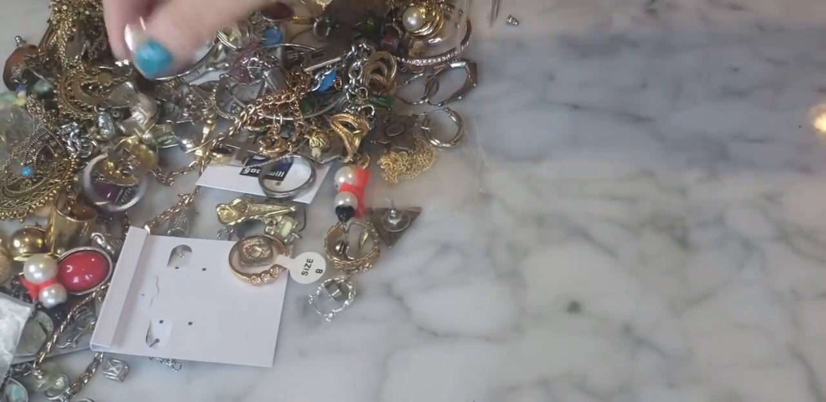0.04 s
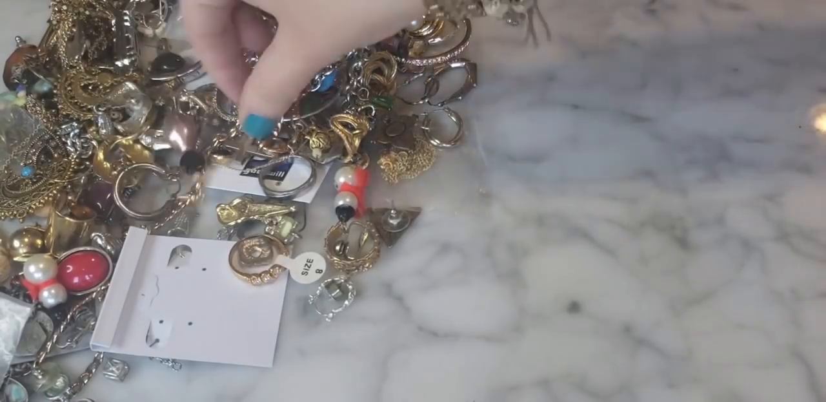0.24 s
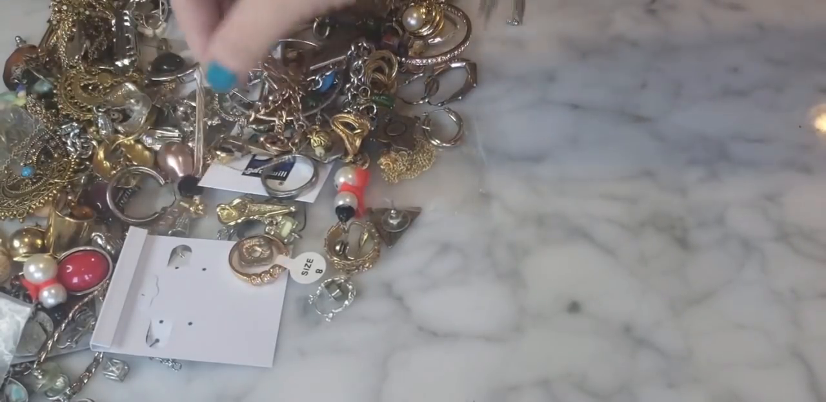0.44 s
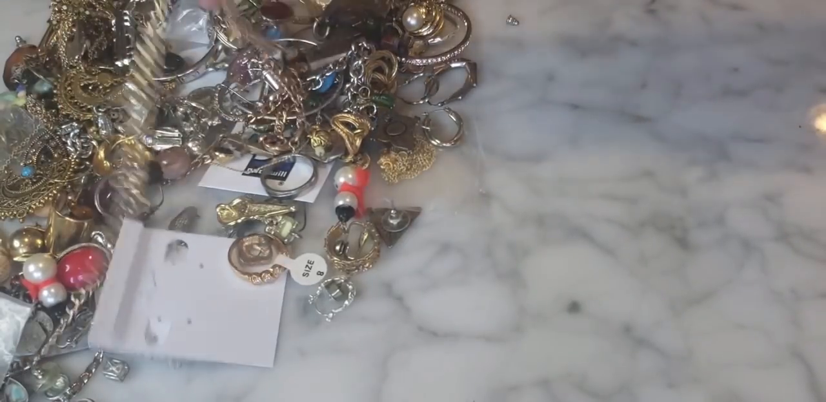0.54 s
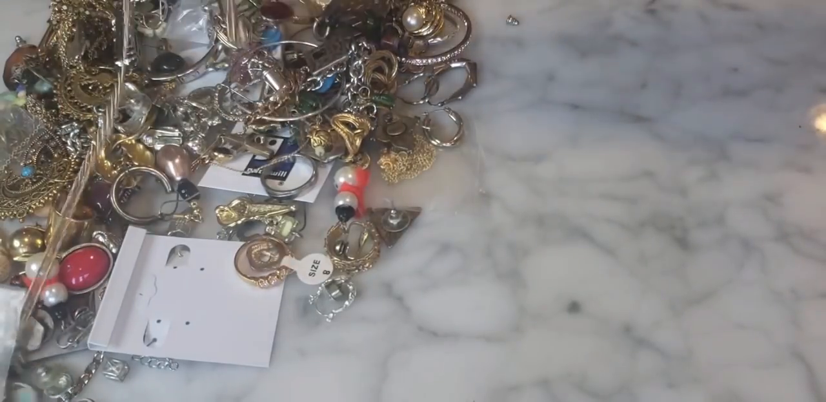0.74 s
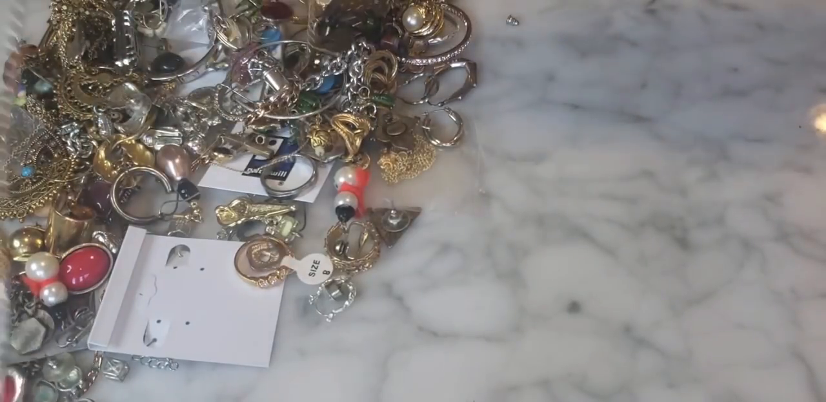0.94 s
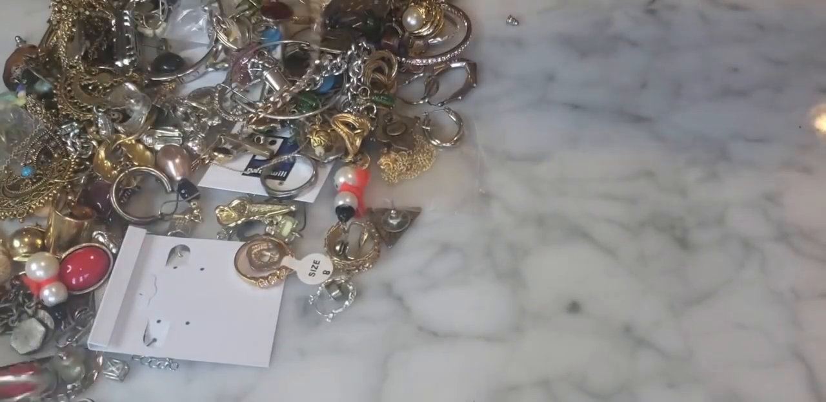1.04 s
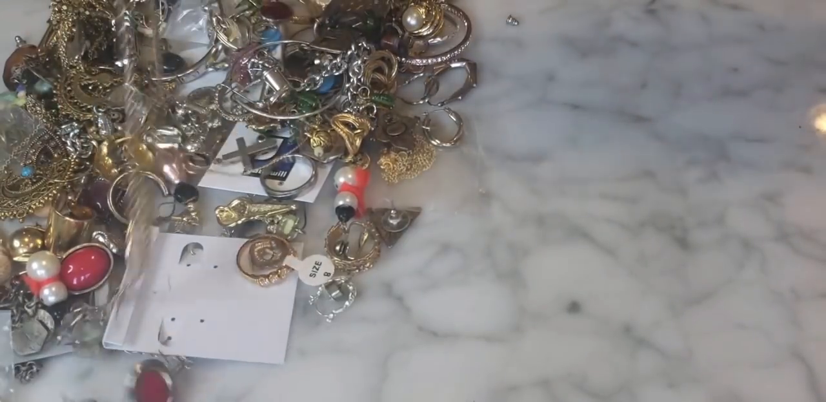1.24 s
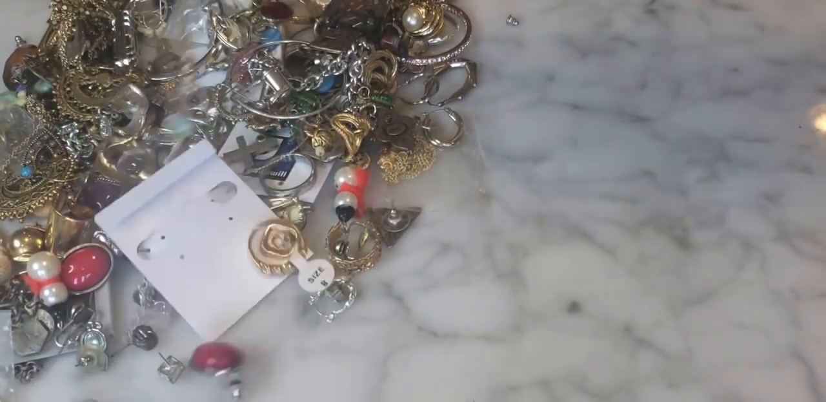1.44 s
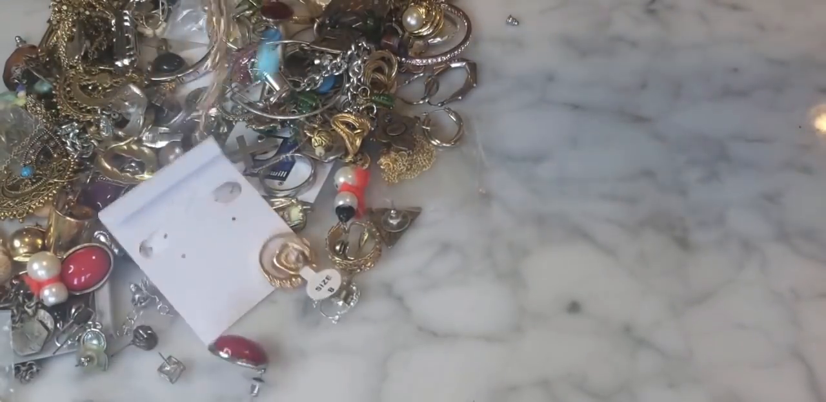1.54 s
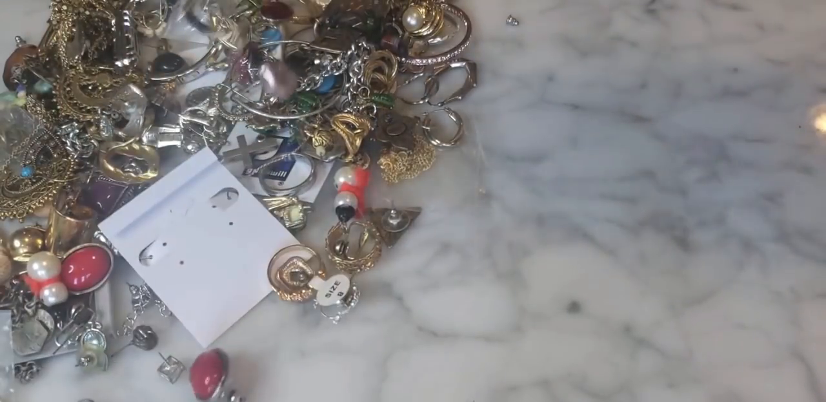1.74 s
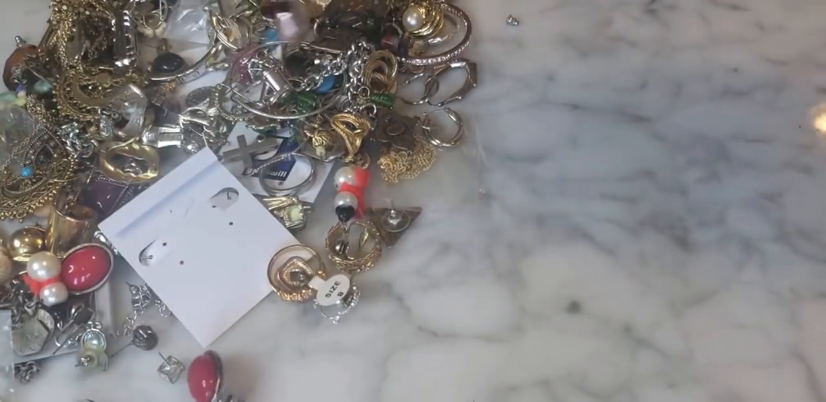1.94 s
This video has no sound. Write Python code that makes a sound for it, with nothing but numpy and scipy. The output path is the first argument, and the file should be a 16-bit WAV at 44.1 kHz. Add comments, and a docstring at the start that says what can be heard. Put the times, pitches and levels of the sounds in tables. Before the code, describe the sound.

A hand digs into a pile of metal trinkets with a small bump, then chain links slide and pieces tick together, pause briefly and jangle harder; small indoor room, close microphone, faint low ventilation hum.

```python
"""In a small room, a hand draws a chain out of a heap of metal jewelry on a marble tabletop.
Sliding links are random impulses that excite damped modes and shake the heap and the tabletop.
Trinkets knock together in bursts of band noise; loose pieces ring as decaying, buzzing sinusoids.
The heap lies a little to the left, by a delay and a level difference between the channels.
A diffuse room tail follows; ventilation adds low filtered noise and a hum."""
import sys
import numpy as np
from scipy import signal
from scipy.fft import rfft, irfft
from scipy.io import wavfile

SR = 44100
rng = np.random.default_rng(int(sys.argv[2]) if len(sys.argv) > 2 else 0)


def inscribe(sig):
    """Save sig as 16-bit PCM at rate SR to the path in sys.argv[1].

    A 1-D sig is mono; a 2-D sig holds one channel per row.
    Samples are clipped to [-1, 1] before scaling.
    """
    pcm = np.round(np.clip(np.atleast_2d(sig).T, -1, 1) * 32767)
    wavfile.write(sys.argv[1], SR, pcm.astype(np.int16))


N = 88200
TIME = np.arange(N) / SR
SPECTRUM_HZ = np.arange(N // 2 + 1) * SR / N + 1e-3   # kept above zero for the logarithm

# Links sliding over the heap, before the layer trims:
# [t/s, clatter level/dB, sparkle level/dB, heap body level/dB]
SLIDING = [(.185, -93.5, -90, -87), (0.189, -52.5, -56, -60), (.255, -49, -49, -56.5),
           (.28, -45.5, -31, -44.5), (0.316, -55, -47, -55), (.37, -49.5, -49, -70.5),
           (.50, -47.5, -51.5, -63), (.625, -49.5, -50.5, -74), (.655, -43, -52, -68),
           (0.731, -45.5, -40, -66.5), (0.79, -41.5, -36.5, -55.5), (.84, -48, -43, -60.5),
           (0.888, -38.5, -43, -67), (.97, -69, -52, -64), (1.04, -57.5, -48.5, -88),
           (1.17, -61, -50, -68.5), (1.252, -47, -45, -72), (1.263, -46, -42.5, -62.5),
           (1.348, -33.5, -33, -53.5), (1.38, -40, -31, -55), (1.426, -33.5, -36, -49),
           (1.46, -61, -47, -55), (1.501, -51, -42, -63.5), (1.592, -39.5, -38, -50),
           (1.636, -45.5, -30.5, -55.5), (1.68, -64.5, -76, -61), (1.713, -41, -44, -51),
           (1.789, -51.5, -48, -68), (1.826, -54.5, -42.5, -61.5), (1.871, -86, -67, -84),
           (2, -83, -63, -91)]
# Relative spectral densities of clatter, sparkle and heap body: [f/Hz, level/dB per Hz]
CLATTER_SPECTRUM = [(1200, -50), (1900, -2), (2400, -4), (3500, 3), (5500, -1), (7000, -0.5), (8500, -2),
                    (11000, -23)]
SPARKLE_SPECTRUM = [(7000, -9), (9500, 8.5), (12000, 6.5), (14000, 13.5), (15500, 13), (17000, -37)]
BODY_SPECTRUM = [(130, -4.5), (300, 4.5), (480, -3), (600, 2), (900, 4), (1400, 5.5), (1900, -3),
                 (3000, -12)]
CLATTER_DB, SPARKLE_DB, BODY_DB = -1.5, -3.5, 0   # layer trims
LINKS_PER_S = 720   # at the quietest; louder slides raise it
LINK_SPREAD_DB, CRACK_T60_S = 3.5, 0.0034   # scale of the random contact size; decay of a crack
LINK_LOW_HZ, LINK_HIGH_HZ = 2300, 15500   # notes of the largest and the smallest link
LINK_RING_DB, LINK_RING_T60_S = -11.5, 0.031   # note of the largest link, relative to its crack
HEAP_GIVE = 1.23   # the heap cushions link contacts above this many times their rms

# Modes of the tabletop under the heap: [f/Hz, relative level/dB, t60/s]
TABLE_MODES = [(597, -8, 0.16), (770, -13, 0.13)]
DIG_S, DIG_DB = 0.272, -37   # the hand digs in and bumps the tabletop; level before the mode levels

# Trinkets knocking together, band levels before the band trims; chatter lasts 0.001 s at least:
# [t/s, chatter length/s, low clack level/dB, high clack level/dB, sparkle level/dB]
KNOCKS = [(0.1861, 0.0022, -27.5, -36, -32), (0.222, 0.00092, -33, -34, -29.5),
          (0.2392, 0.0025, -34.5, -31.5, -29), (0.267, 0.0027, -38, -24, -24.5),
          (0.2714, 0.0063, -47, -34, -19), (0.278, 0.0059, -36.5, -23, -56), (0.348, 0.0064, -37, -35, -38),
          (0.5056, 0.001, -34, -36.5, -23.5), (0.647, 0.007, -35, -36, -34),
          (0.6543, 0.0025, -30, -33.5, -28), (0.6833, 0.0029, -43, -37, -27),
          (0.7543, 0.0011, -26, -26, -33.5), (0.7623, 0.0013, -48, -27, -41),
          (0.7777, 0.0044, -27, -24, -24), (0.8153, 0.0028, -35, -30, -48),
          (0.8719, 0.00096, -29, -26, -32.5), (0.8795, 0.0012, -28.5, -22, -28),
          (0.899, 0.001, -49, -32, -41), (0.9255, 0.0034, -36.5, -38, -39), (0.941, 0.002, -37, -32, -53),
          (0.9545, 0.0012, -41, -38, -41), (0.974, 0.0025, -42.5, -38, -37), (0.984, 0.002, -38, -33, -48),
          (1.006, 0.0022, -47, -35, -36), (1.074, 0.0049, -50.5, -43.5, -43),
          (1.0966, 0.0051, -55, -44, -35.5), (1.2067, 0.0019, -48, -45.5, -31.5),
          (1.27, 0.0012, -28.5, -30, -31), (1.3011, 0.0017, -30, -31.5, -23),
          (1.307, 0.0014, -36, -38, -21.5), (1.405, 0.0014, -36, -20.5, -19),
          (1.425, 0.0029, -26.5, -54, -30), (1.553, 0.0029, -28, -32.5, -28),
          (1.5574, 0.0011, -31.5, -23, -30), (1.5787, 0.006, -29.5, -44, -28),
          (1.584, 0.0031, -41, -21.5, -29.5), (1.6187, 0.0041, -40.5, -44, -23),
          (1.6874, 0.0018, -58, -32, -38), (1.696, 0.0015, -35.5, -38, -29.5),
          (1.7141, 0.0014, -32, -34, -31), (1.7729, 0.004, -37, -38.5, -38.5),
          (1.783, 0.0018, -33, -39, -34), (1.8475, 0.0038, -53.5, -43, -58)]
# Trims of the knock bands: [body level/dB, low clack level/dB, high clack level/dB, sparkle level/dB]
KNOCK_TRIM_DB = [-1.4, -1.96, -3.43, -3.5]
# Frequencies at which those four levels apply: [body f/Hz, low clack f/Hz, high clack f/Hz, sparkle f/Hz]
KNOCK_BAND_HZ = [1400, 2350, 6700, 12500]
BODY_BELOW_DB = -24   # the knock's body relative to its low clack, before the trims
CONTACT_RISE_S, CHATTER_SAG_DB, CHATTER_T60_S = 0.0001, -1, 0.013
PIECE_COLOUR_DB, CHATTER_ROUGH = 1.12, 0.45   # deviations: level per band; log amplitude per step

# Loose pieces ringing, before the ping trim: [t/s, f/Hz, level/dB, t60/s]
PINGS = [(.250, 13800, -34.5, 0.11), (0.2697, 13300, -25, 0.053), (0.273, 13680, -29, 0.099),
         (.302, 13840, -31, 0.066), (0.329, 11900, -35.5, 0.036), (0.5058, 10350, -27.5, 0.01),
         (0.879, 3200, -27.5, 0.011), (0.9274, 3200, -34, 0.024), (1.097, 14900, -25.5, 0.017),
         (1.206, 11850, -47, 0.12), (1.2702, 15300, -16, 0.012), (1.346, 3500, -42, 0.065),
         (1.532, 13840, -30.5, 0.061), (1.5578, 7440, -19, 0.0086), (1.584, 7000, -25.5, 0.018),
         (1.619, 13870, -27.5, 0.092), (1.696, 6900, -28, 0.016), (1.743, 7000, -32.5, 0.012),
         (1.811, 11970, -36, 0.06), (1.940, 11950, -41.5, 0.053)]
PING_RISE_S, PING_DB = 0.00032, 3
NEIGHBOUR_DB, NEIGHBOUR_SPREAD = -9.5, .07   # other modes: joint level; largest log-frequency distance
PING_BUZZ_SHARE, PING_BUZZ_HZ = .35, 120   # final share of power; bandwidth of the buzz

# Level difference, left minus right: [f/Hz, level/dB]
LEFT_BIAS = [(250, -1), (600, 3.5), (1000, 0.5), (2200, 3.5), (4000, 7), (8000, 5.5), (13000, 1.5)]
LEFT_LEAD_S = 0.00018
CHANNEL_LIKENESS = 0.43   # share of noise power common to both channels

# Decay time of the room tail: [f/Hz, t60/s]
ROOM_T60 = [(300, 0.87), (2500, 0.26), (6000, 0.4), (14000, 0.13)]
# Room tail relative to the direct sound: [f/Hz, level/dB]
ROOM_DB = [(300, -11.5), (2500, -4), (6000, -8.5), (14000, -8.5)]
FIRST_ECHO_S = 0.0045

# Relative spectral density of the ventilation rumble: [f/Hz, level/dB per Hz]
RUMBLE_SPECTRUM = [(20, -20), (40, -24), (58, 4), (76, -4.5), (95, -2.5), (118, -5), (155, -17.5),
                   (280, -19.5), (500, -38), (800, -29.5), (1200, -45), (16000, -56)]
RUMBLE_DB, RUMBLE_SIDE_DB = -58, -16   # rms of the common part; opposed part relative to it
HUM_HZ, HUM_DB = 75.1, -61.5   # hum level as rms
CUTOFF_HZ = 16000

# Band-pass filters shared by the knocks and the room
EDGES = np.geomspace(140, 17500, 29)
CENTRES = np.sqrt(EDGES[1:] * EDGES[:-1])
BANK = [signal.butter(2, [lo, hi], "band", fs=SR, output="sos") for lo, hi in zip(EDGES, EDGES[1:])]


def sliding_chain():
    """Impulsive excitation: link contacts clatter and sparkle, and shake the heap and the tabletop."""
    s, *columns = np.transpose(SLIDING)
    clatter, sparkle, body = (from_db(np.interp(TIME, s, c)) for c in columns)
    busy = np.maximum(clatter / clatter.mean(), 1)   # a louder slide moves more links
    ticks = link_ticks(busy, count=70)
    cushioned = np.tanh(rms_one(ticks) / HEAP_GIVE)
    heap = from_db(BODY_DB) * body * coloured(cushioned, BODY_SPECTRUM)
    clatter_sound = from_db(CLATTER_DB) * clatter * coloured(ticks, CLATTER_SPECTRUM)
    sparkle_sound = from_db(SPARKLE_DB) * sparkle * coloured(ticks, SPARKLE_SPECTRUM)
    return heap + tabletop(heap) + clatter_sound + sparkle_sound


def link_ticks(busy, count):
    """Modal response: random contacts excite each link's crack and note; lower links ring longer."""
    t, out = TIME[:2048], 0
    size_db = LINK_SPREAD_DB * np.minimum(rng.exponential(1, N), 3.5)
    sizes = from_db(size_db) * rng.choice([-1, 1], N)
    contact = rng.random(N) < busy * LINKS_PER_S / SR
    clicks = sizes / np.sqrt(busy) * contact   # offsets the power gained by denser contacts
    dealt = rng.integers(0, count, N)   # which link each contact belongs to
    for k, hz in enumerate(np.geomspace(LINK_LOW_HZ, LINK_HIGH_HZ, count)):
        crack = port_noise(len(t)) * from_db(-60 * t / CRACK_T60_S)
        t60 = LINK_RING_T60_S * np.sqrt(LINK_LOW_HZ / hz)
        decay = from_db(LINK_RING_DB - 60 * t / t60) * np.sqrt(hz / LINK_LOW_HZ)
        note = np.sin(2 * np.pi * hz * t + rng.normal(0, 1, (2, 1))) * decay
        own_clicks = (clicks * (dealt == k))[None]
        out = out + signal.oaconvolve(own_clicks, crack + note, axes=1)[:, :N]
    return out


def tabletop(heap):
    """Driven and free vibration: the heap keeps the table modes ringing; the first dig strikes them once."""
    out, since = 0, np.maximum(TIME - DIG_S, 0)
    for hz, db, t60 in TABLE_MODES:
        r = from_db(-60 / (t60 * SR))   # pole radius
        ring = signal.lfilter([1, 0, -1], [1, -2 * r * np.cos(2 * np.pi * hz / SR), r * r], heap)
        struck = from_db(DIG_DB - 60 * since / t60) * np.sin(2 * np.pi * hz * since)
        out = out + from_db(db) * (rms_one(ring) * heap.std() / 2 + struck)
    return out


def knocks():
    """Repeated impact: a few milliseconds of chatter between two pieces, each with its own colour."""
    out, t = np.zeros((2, N)), TIME[:1280]
    rows = np.array(KNOCKS)
    length = np.maximum(rows[:, 1:2], .001)
    sag_db = CHATTER_SAG_DB * np.minimum(t / length, 1)
    decay_db = -60 * np.maximum(t - length, 0) / CHATTER_T60_S
    envelope = (1 - np.exp(-t / CONTACT_RISE_S)) * from_db(sag_db + decay_db)
    steps = np.exp(CHATTER_ROUGH * rng.standard_normal((len(rows), 128)))
    chatter = np.repeat(steps, len(t) // 128, axis=1)
    # Band levels become energy densities: longer chatter adds, wider bands dilute
    widths = np.diff([500, 2000, 5000, 9000, 16000])
    band_db = np.column_stack([rows[:, 2] + BODY_BELOW_DB, rows[:, 2:]]) + KNOCK_TRIM_DB
    density_db = band_db + 10 * np.log10(length / widths)
    levels = np.array([np.interp(np.log(CENTRES), np.log(KNOCK_BAND_HZ), row) for row in density_db])
    sounds = 0
    for k in np.flatnonzero(CENTRES > 500):
        noise = port_noise(chatter.size).reshape(2, *chatter.shape)
        burst = signal.sosfilt(BANK[k], noise * envelope * chatter + 1e-18)
        energy = np.mean(np.sum(burst ** 2, axis=2), axis=0) / SR
        colour_db = PIECE_COLOUR_DB * rng.standard_normal(len(rows))
        gain = from_db(levels[:, k] + colour_db) * np.sqrt((EDGES[k + 1] - EDGES[k]) / energy)
        sounds = sounds + burst * gain[:, None]
    for k, s in enumerate(rows[:, 0]):
        add(out, s, sounds[:, k])
    return out


def pings():
    """Damped free vibration: a main mode and weak neighbours, buzzing against the heap as they die."""
    out, t = np.zeros((2, N)), TIME[:8192]
    smooth = signal.butter(2, PING_BUZZ_HZ, fs=SR, output="sos")
    for s, hz, db, t60 in PINGS:
        offset = np.array([[0], [2 * np.pi * hz * LEFT_LEAD_S + rng.normal(0, 1)]])   # left, right
        angle = 2 * np.pi * hz * t + rng.uniform(0, 2 * np.pi) + offset
        # Slow noise on the in-phase and the quadrature part makes the buzz
        swing, slip = (rms_one(signal.sosfilt(smooth, port_noise(len(t)))) for _ in range(2))
        buzz = PING_BUZZ_SHARE * (1 - from_db(-120 * t / t60))
        steady = np.sqrt(1 - buzz) * np.sin(angle)
        buzzing = np.sqrt(buzz / 2) * (swing * np.sin(angle) + slip * np.cos(angle))
        ratios = np.exp(NEIGHBOUR_SPREAD * rng.uniform(-1, 1, size=6))
        neighbours = sum(np.sin(angle * ratio) for ratio in ratios)
        tone = steady + buzzing + from_db(NEIGHBOUR_DB) * rms_one(neighbours)
        envelope = from_db(PING_DB + db - 60 * t / t60) * (1 - np.exp(-t / PING_RISE_S))
        add(out, s, envelope * tone)
    return out


def from_the_left(x):
    """Interaural-style differences: the right channel is delayed, and weaker where the bias is positive."""
    bias = from_db(at_hz(LEFT_BIAS, SPECTRUM_HZ) / 2)   # half of the difference to each side
    delay = np.exp(-2j * np.pi * SPECTRUM_HZ * LEFT_LEAD_S)
    return irfft(rfft(x) * np.array([bias, delay / bias]), N)


def room(x):
    """Diffuse reverberation: convolution with noise whose decay time depends on frequency."""
    t, response = TIME[:22050], 0
    for sos, hz in zip(BANK, CENTRES):
        decay = from_db(-60 * t / at_hz(ROOM_T60, hz)) * (t > FIRST_ECHO_S)
        tail = rng.standard_normal((2, len(t))) * decay / np.linalg.norm(decay)
        response = response + from_db(at_hz(ROOM_DB, hz)) * signal.sosfilt(sos, tail)
    return signal.fftconvolve(x, response, axes=1)[:, :N]


def ventilation():
    """Broadband flow noise with a tonal line: low rumble nearly alike on both sides, and a common hum."""
    mid, side = (coloured(rng.standard_normal(N), RUMBLE_SPECTRUM) for _ in range(2))
    rumble = from_db(RUMBLE_DB) * (mid + from_db(RUMBLE_SIDE_DB) * side * [[1], [-1]])
    hum = from_db(HUM_DB) * np.sqrt(2) * np.sin(2 * np.pi * HUM_HZ * TIME)
    return rumble + hum


def port_noise(size):
    """Partial coherence: white noise made of a part shared by both channels and a part of each one's own."""
    shared, own = rng.standard_normal(size), rng.standard_normal((2, size))
    alike = np.clip(CHANNEL_LIKENESS, 0, 1)
    return np.sqrt(alike) * shared + np.sqrt(1 - alike) * own


def coloured(x, spectrum):
    """Linear filtering: shape by a smooth spectrum, then scale to unit rms."""
    gain = from_db(at_hz(spectrum, SPECTRUM_HZ))
    return rms_one(irfft(rfft(x) * gain, N))


def at_hz(points, hz):
    """Logarithmic pitch scale: interpolate a table along log frequency."""
    f, v = np.transpose(points)
    return np.interp(np.log(hz), np.log(f), v)


def from_db(db):
    """Level definition: decibels to amplitude ratio."""
    return 10 ** (np.asarray(db) / 20)


def rms_one(x):
    """Power normalisation: scale to unit rms."""
    return x / np.sqrt(np.mean(x ** 2) + 1e-20)


def add(out, s, x):
    """Superposition: mix a stereo sound in at time s."""
    i = max(int(s * SR), 0)
    out[:, i:i + x.shape[1]] += x[:, :max(N - i, 0)]


def scene():
    """Superposition of direct sound, reverberation and background."""
    jewelry = from_the_left(sliding_chain() + knocks() + pings())
    return jewelry + room(jewelry) + ventilation()


def record(dry):
    """Band limitation: a steep elliptic low-pass cuts the top."""
    low_pass = signal.ellip(10, .3, 70, CUTOFF_HZ, fs=SR, output="sos")   # ripple and stopband in dB
    return signal.sosfilt(low_pass, dry)


dry = scene()
out = record(dry)
inscribe(out)
```